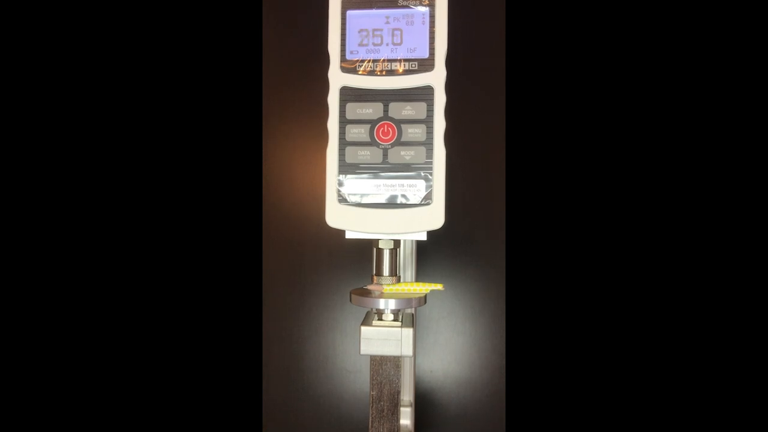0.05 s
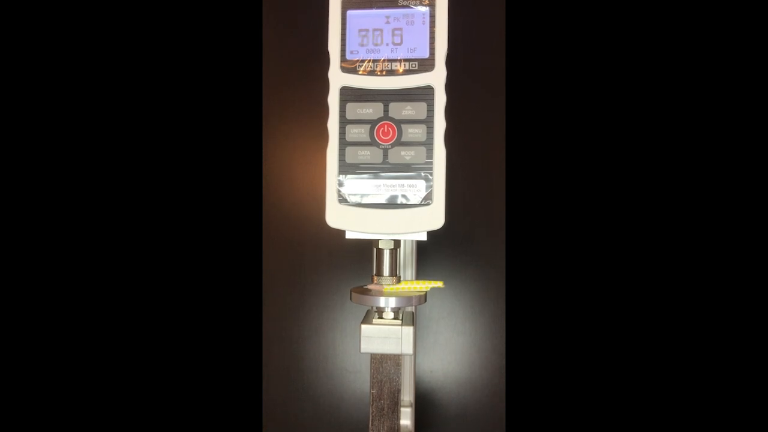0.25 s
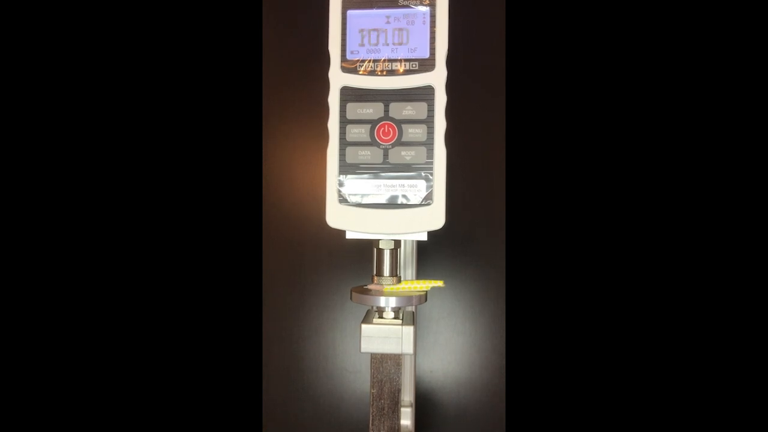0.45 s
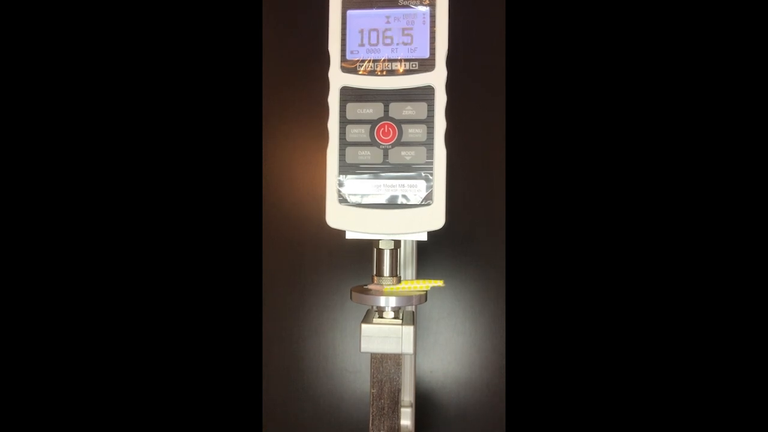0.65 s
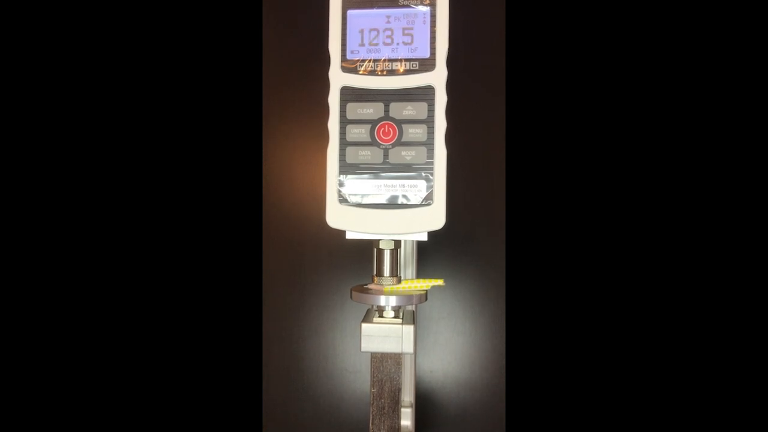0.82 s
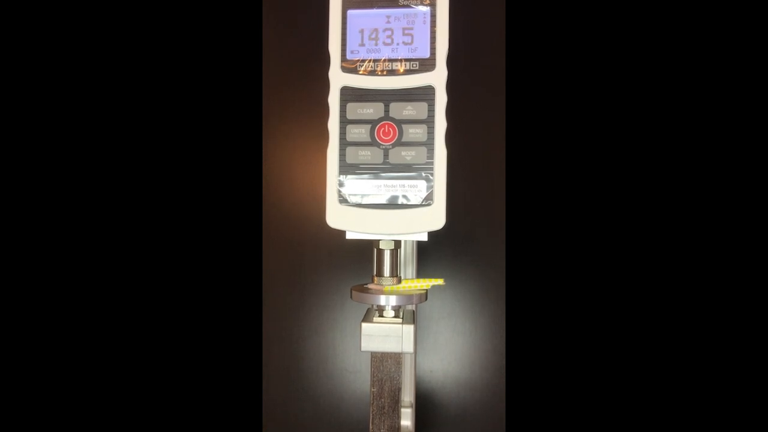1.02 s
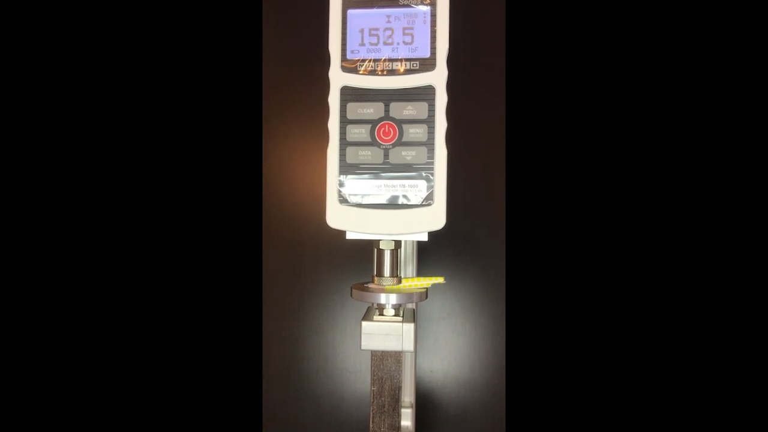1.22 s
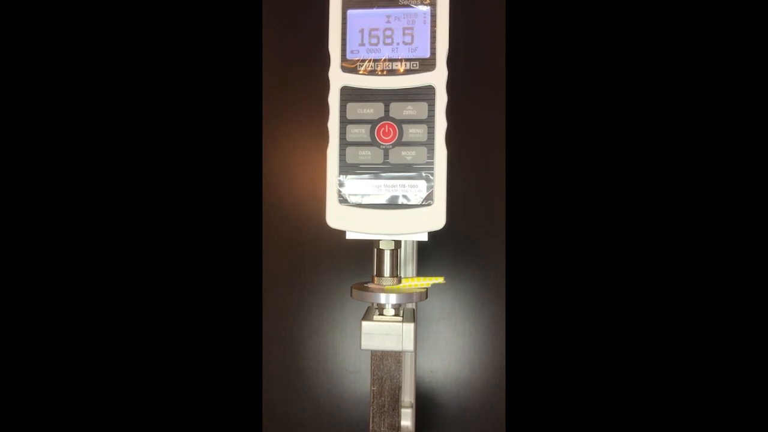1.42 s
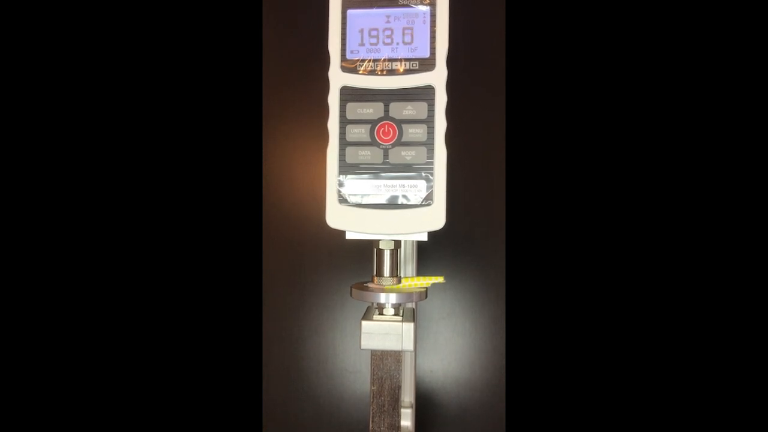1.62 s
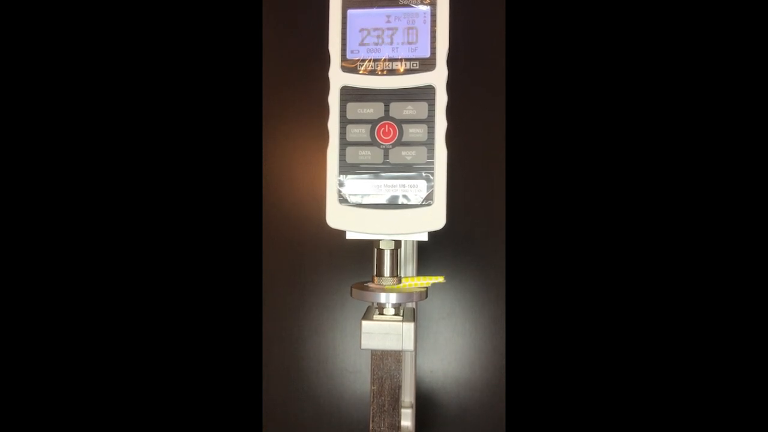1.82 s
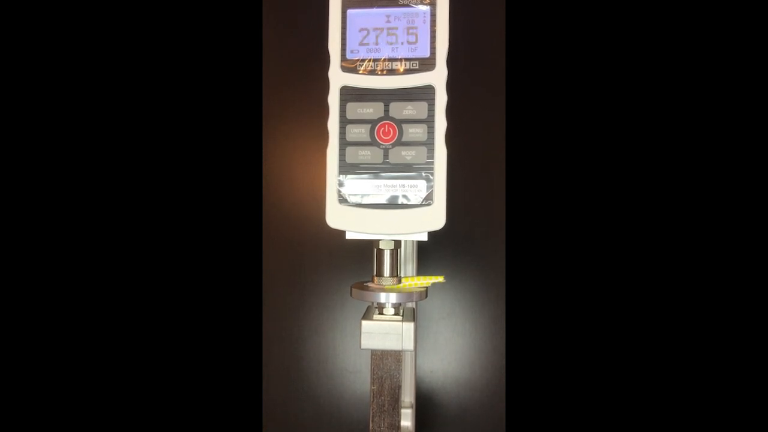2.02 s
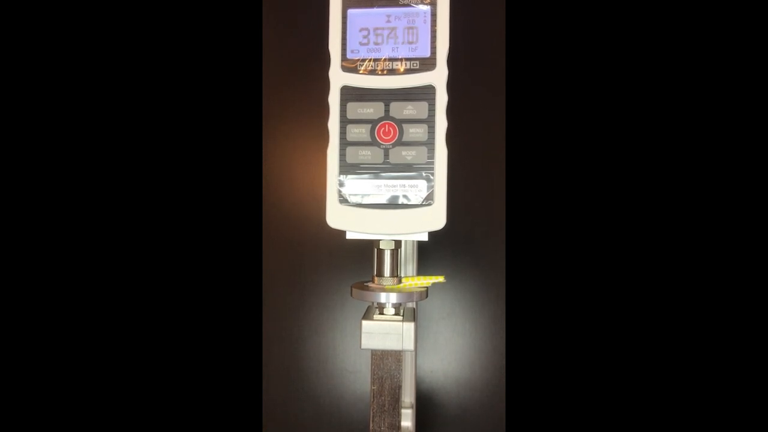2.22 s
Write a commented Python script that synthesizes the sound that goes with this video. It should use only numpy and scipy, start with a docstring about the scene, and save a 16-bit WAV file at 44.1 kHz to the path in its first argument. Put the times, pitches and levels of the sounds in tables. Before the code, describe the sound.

Sharp, dry cracks with a brief high ring come in uneven bursts as a test stand crushes something brittle near the microphone. Fine ticking fills the gaps, and the snaps grow sparser over low workshop rumble and motor hum.

```python
"""In a small workshop, a motorised test stand slowly crushes a small brittle object, heard close by.
Each fracture releases stored strain as a sharp snap with a brief high ring. It knocks the stand into
resonance, and some fractures set a metal part pinging. Between the cracks the object ticks, creeps and
slips, over the hum and thin whine of the drive and the rumble and hiss of the room."""
import sys
import numpy as np
from scipy import signal
from scipy.fft import rfft, irfft
from scipy.io import wavfile
from scipy.ndimage import uniform_filter1d

SR = 44100
rng = np.random.default_rng(int(sys.argv[2]) if len(sys.argv) > 2 else 0)


def digitize_waveform(pressure):
    """Quantize a signal to 16-bit integers and store it at the path in sys.argv[1].

    Rows of a 2-D input are taken as channels; values are limited to [-1, 1].
    """
    field = np.atleast_2d(pressure).T
    bounded = np.clip(field, -1, 1)
    quanta = np.round(bounded * 32767).astype(np.int16)
    wavfile.write(sys.argv[1], SR, quanta)


N = 103635


def undb(db):
    """Amplitude ratio: a factor of ten for every 20 dB."""
    return 10 ** (np.asarray(db) / 20)


def unit(x):
    """Normalisation to an rms of 1."""
    return x / np.sqrt(np.mean(x ** 2))


def burst(x, db):
    """Equal energy: a transient is scaled to match one millisecond at this level."""
    return x * undb(db) * np.sqrt(SR / 1000 / np.sum(x ** 2))


def band(x, lo, hi):
    """Causal band-pass filtering, with edges in Hz."""
    hi = min(max(hi, lo + 100), SR / 2 - 500)
    return signal.sosfilt(signal.butter(2, [lo, hi], "band", fs=SR, output="sos"), x)


def resonate(x, hz, width_hz):
    """Forced response of one damped resonator, with gain 1 at its centre."""
    return signal.lfilter(*signal.iirpeak(hz, hz / width_hz, fs=SR), x)


def wander(rate_hz):
    """Slow fluctuation: random steps smoothed twice, with an rms of 1."""
    hold = int(SR / rate_hz)
    steps = np.repeat(rng.standard_normal(N // hold + 1), hold)
    return unit(uniform_filter1d(uniform_filter1d(steps, hold), hold)[:N])


def add(out, start, x):
    """Superposition: a sound joins the mix at its start in seconds."""
    i = int(np.clip(start * SR, 0, N - 1))
    out[i:i + len(x)] += x[:N - i]


def workshop():
    """Ambient noise: a low rumble and a soft hiss whose middle and treble drift in level."""
    # Background spectrum. Each row: frequency in Hz, relative spectral density in dB.
    spectrum = [(15, -52), (25, -24), (43, 0.5), (92, 0), (190, -4), (309, -10), (531, -14), (936, -17),
                (1650, -20), (1940, -19), (2160, -23), (2350, -20.5), (10100, -29), (11900, -28.5),
                (16000, -29)]
    # Drift of the hiss. Each row: time in seconds, middle gain in dB, treble gain in dB.
    drift = [(0, 7, -2.5), (.2, 5.5, -4.5), (.4, 6.5, 0), (0.619, 3, 1.5), (1.15, 2, 6), (1.45, 4, 2.5),
             (1.68, 2.5, 2.5), (1.85, 0, -6.5), (2.1, 2, -6), (2.35, 2, -6.5)]
    t, f = np.arange(N) / SR, np.maximum(np.fft.rfftfreq(N, 1 / SR), 1)
    hz, db = np.transpose(spectrum)
    noise = rfft(rng.standard_normal(N)) * undb(np.interp(np.log(f), np.log(hz), db))
    noise = rfft(unit(irfft(noise, N)) * undb(-61.16))
    low, high = 1 / (1 + (f / 350) ** 4), 1 - 1 / (1 + (f / 6500) ** 14)
    times, middle_db, treble_db = np.transpose(drift)
    middle = irfft(noise * (1 - low - high), N) * undb(np.interp(t, times, middle_db))
    treble = irfft(noise * high, N) * undb(np.interp(t, times, treble_db))
    return irfft(noise * low, N) + middle + treble


def wavering_tone(hz, db):
    """Random frequency and amplitude modulation make a sine tone waver."""
    amplitude = np.sqrt(2) * undb(db + 1.7 * wander(9.18))
    cycles = np.cumsum(hz + 2.44 * wander(16)) / SR
    return amplitude * np.sin(2 * np.pi * cycles)


def drive():
    """Tonal machine noise: the motor hums; its narrow-band whine dips, then grows with the load."""
    # Tones of the hum. Each row: frequency in Hz, level in dB before the common trim.
    hum_tones = [(59.2, -68.5), (107.7, -69), (532.9, -75.5), (1626, -81.5), (2116, -77.5), (3989, -82),
                 (4764, -85.5)]
    # Envelope of the whine. Each row: time in seconds, level in dB.
    whine_levels = [(0, -75), (1.3, -95), (1.7, -73.5), (2.0, -69.5), (2.35, -68.5)]
    trim_db, fade_db_per_s = -2.5, 4.5
    whine_hz, width_hz = 2149, 94
    t = np.arange(N) / SR
    hum = sum(wavering_tone(hz, db + trim_db) for hz, db in hum_tones)
    motor = wavering_tone(hz=144.8, db=-65 - fade_db_per_s * t)
    whine = resonate(resonate(rng.standard_normal(N), whine_hz, width_hz), whine_hz, width_hz)
    return hum + motor + unit(whine) * undb(np.interp(t, *np.transpose(whine_levels)))


def room_tail(t, t60):
    """Reverberation: uneven reflections build up, then decay by 60 dB in t60 seconds."""
    delay_s, rise_s = 0.001, 0.0032
    rise = 1 - np.exp(-np.maximum(t - delay_s, 0) / rise_s)
    clumps = np.exp(0.32 * unit(uniform_filter1d(rng.standard_normal(len(t)), size=60)))
    return rng.standard_normal(len(t)) * clumps * rise * np.exp(-np.log(1000) * t / t60)


def slips():
    """Sliding friction: the object slips on the platen in grainy scrapes that start at once and fade."""
    # Each row: start in seconds, decay time constant in seconds, squeak in Hz, initial level in dB.
    slip_events = [(0.237, 0.076, 10300, -58), (1.497, 0.026, 6100, -61.5), (2.035, 0.027, 4600, -60)]
    out, t = np.zeros(N), np.arange(SR // 5) / SR
    for start, decay_s, hz, db in slip_events:
        grit = rng.standard_normal(len(t)) * np.exp(.6 * rng.standard_normal(len(t)))
        scrape = band(grit, 3050, 8400) + 2.0 * resonate(grit, hz, width_hz=470)
        add(out, start, unit(scrape) * undb(db) * np.exp(-t / decay_s))
    return out


def fracture(t, decay_ms, impulse):
    """Stress release: one impulse, then splintering noise that decays exponentially."""
    splinters = rng.standard_normal(len(t)) * np.exp(-1000 * t / decay_ms)
    splinters /= np.sqrt(np.sum(splinters ** 2))
    splinters[0] += impulse
    return splinters


def creep():
    """Creep under load: tiny uneven steps ring faintly, their pitch and level slowly sinking."""
    median_steps_per_s, sag_hz_per_s, fade_db_per_s = 65, 360, 2.5
    out, t = np.zeros(N), np.arange(SR // 50) / SR
    draws = rng.standard_normal((int(2 * median_steps_per_s * N / SR), 3))
    starts = 0.1 + np.cumsum(np.exp(.6 * draws[:, 0])) / median_steps_per_s
    for start, (_, size, pitch) in zip(starts[starts < N / SR], draws):
        hz = 12360 - sag_hz_per_s * start + 220 * pitch
        step = fracture(t, decay_ms=.6, impulse=1.5)
        ring = resonate(resonate(step, hz, width_hz=350), hz, width_hz=4000)
        add(out, start, burst(ring, db=-64 + 3.5 * size - fade_db_per_s * start))
    return out


def ticks():
    """Acoustic emission: tiny fractures between the cracks each give a high ring and a faint knock."""
    # Each row: start in seconds, ring frequency in Hz, knock level in dB, ring level in dB.
    tick_events = [(.2775, 12200, -68, -55), (.285, 10000, -55, -53), (0.302, 10200, -59, -46),
                   (0.3902, 11600, -43.5, -41), (0.4, 12000, -54, -41), (.7265, 12400, -71, -51.5),
                   (0.774, 13200, -56, -48), (0.853, 11900, -46, -62), (.950, 13900, -56, -44),
                   (0.952, 14000, -58, -40), (0.989, 12300, -55, -51.5), (.9963, 12600, -62, -51),
                   (1.074, 12400, -50, -49), (1.1847, 11800, -49.5, -43.5), (1.209, 12000, -53, -46),
                   (1.2285, 12300, -47, -50), (1.2388, 13000, -53, -45), (1.2676, 12700, -46, -43),
                   (1.7165, 11900, -68, -50), (1.7559, 12200, -70, -49.5), (1.7748, 12100, -52, -48.5),
                   (1.836, 12100, -56, -47), (1.9852, 12300, -61.5, -51.5), (2.1045, 11400, -65, -54)]
    out, t = np.zeros(N), np.arange(SR // 10) / SR
    for start, ring_hz, knock_db, ring_db in tick_events:
        direct = burst(fracture(t, decay_ms=0.78, impulse=0.69), db=0)
        tick = direct + burst(room_tail(t, t60=0.093), db=-8)
        ring = resonate(band(tick, 6000, 16500), ring_hz, width_hz=2227)
        knock = band(tick, 3600, 5400)
        add(out, start, burst(ring, ring_db) + burst(knock, knock_db))
    return out


def stand(x):
    """Structural resonance: the modes of the stand colour whatever knocks it."""
    # Each row: mode frequency in Hz, bandwidth in Hz, linear gain.
    modes = [(197, 73, 1.12), (352, 50, 1.1), (582, 91, 2.86), (820, 85, 1.52), (1255, 340, 0.53),
             (1460, 46, 1.6), (2016, 63, 2.8), (2475, 100, 0.78), (2890, 250, 1.12), (3752, 180, 1.33),
             (4190, 180, 0.84)]
    return x + sum(gain * resonate(x, hz, width_hz) for hz, width_hz, gain in modes)


def metal_ping(t):
    """Free vibration: a jolted metal part rings as a sum of damped sines."""
    # Each row: mode frequency in Hz, relative level in dB, time to fall 60 dB in seconds.
    modes = [(2440, -2, .17), (3850, -8, .1), (13640, 2, .19), (13760, -4, .16)]
    return sum(undb(db) * np.sin(2 * np.pi * hz * t) * np.exp(-np.log(1000) * t / t60)
               for hz, db, t60 in modes)


def cracks():
    """Brittle fracture: each snap rings the fragment and knocks the stand, and the room reverberates."""
    # Each row: start in seconds, ring and knock frequencies in Hz, six band levels from low to high
    # in dB, gain of the treble sent into the room in dB, gain of the metal ping in dB.
    crack_events = [(.2145, 12300, 1990, -36, -26.5, -35, -35, -23.5, -26.5, -3, -50),
                    (0.226, 12400, 5780, -43.5, -44, -32, -34.5, -28.5, -34, 3, -75),
                    (.3282, 12500, 2000, -50, -46.5, -43, -35, -19, -24, -1, -75),
                    (.3403, 10880, 2030, -37, -29.5, -30, -25, -10, -14, -1, -50),
                    (0.4366, 12040, 2540, -52, -36.5, -42, -41.5, -22, -52, -3.5, -53),
                    (.7895, 12300, 3880, -55.5, -48, -41, -46.5, -37.5, -50, 3, -64),
                    (0.8308, 11730, 5240, -42.5, -37, -29.5, -23.5, -24, -20, -3, -51),
                    (0.9549, 14100, 3670, -46.5, -42.5, -33, -48.5, -36, -19.5, -1.5, -56),
                    (1.0084, 11900, 5400, -62, -54, -41, -43, -34, -49, -3, -70),
                    (1.1056, 15800, 3680, -49, -46, -45, -53, -48, -28, 0, -70),
                    (1.2414, 13160, 4050, -66, -50, -51, -38, -39, -30.5, 4, -79.5),
                    (1.243, 12900, 4200, -56, -48, -39, -43, -24, -28, -2, -75),
                    (1.2543, 13850, 6880, -48.5, -34, -34, -29, -25, -19.5, 2.5, -75),
                    (1.2751, 12000, 3740, -44, -33, -26.5, -58, -35.5, -52, -2, -62),
                    (1.2895, 12050, 3670, -38, -29, -34, -37.5, -46, -56, -1, -79),
                    (1.4111, 9600, 1970, -45.5, -32, -32, -29.5, -30, -44, -7.5, -80),
                    (1.8414, 11020, 3960, -48, -43, -38, -50, -48, -48, 1, -73),
                    (2.1342, 11100, 5000, -66, -48.5, -41, -46.5, -48, -49, 3, -80),
                    (2.14, 11250, 4000, -68, -62, -58, -50, -33, -45.5, -4, -83)]
    # Bands of a snap. Each row: lower and upper edges in Hz, decay time constant in ms, ratio of impulse
    # to splintering, relative room level in dB, reverberation time in seconds.
    bands = [(166, 1300, 3, 0.27, -1, 0.17), (1500, 3170, 6.9, 0.8, -14, 0.43),
             (2800, 6220, 2.8, 0.72, -14.5, 0.264), (5100, 9550, 1.28, 0.65, -13.5, 0.18),
             (9260, 13250, 1.8, 3.9, -21, 0.28), (12600, 20000, 0.433, 1.6, -19, 0.12)]
    treble_from_hz = 5000
    out, t = np.zeros(N), np.arange(SR // 3) / SR
    for start, ring_hz, knock_hz, *levels, send_db, ping_db in crack_events:
        for db, (lo, hi, decay_ms, impulse, room_db, t60) in zip(levels, bands):
            release = fracture(t, decay_ms, impulse)
            snap = stand(release) + 6.2 * resonate(release, ring_hz, width_hz=850)
            snap += 3.0 * resonate(release, knock_hz, width_hz=300)
            add(out, start, burst(band(snap, lo, hi), db))
            reflections = room_tail(t, t60)
            tail = stand(reflections) + 1.5 * resonate(reflections, ring_hz, width_hz=1200)
            tail += 1.7 * resonate(reflections, knock_hz, width_hz=400)
            tail_db = db + room_db + send_db * (lo > treble_from_hz)
            add(out, start, burst(band(tail, lo, hi), tail_db))
        add(out, start, undb(ping_db) * metal_ping(t))
    return out


def scene():
    """Superposition of the breaking object, the drive and the workshop in one channel."""
    return (cracks() + ticks() + creep() + slips() + drive() + workshop())[None]


def record(dry):
    """Band limiting: a steep low-pass filter cuts the treble above 16 kHz."""
    return signal.sosfilt(signal.ellip(8, .2, 70, 16000, fs=SR, output="sos"), dry)


dry = scene()
out = record(dry)
digitize_waveform(out)
```